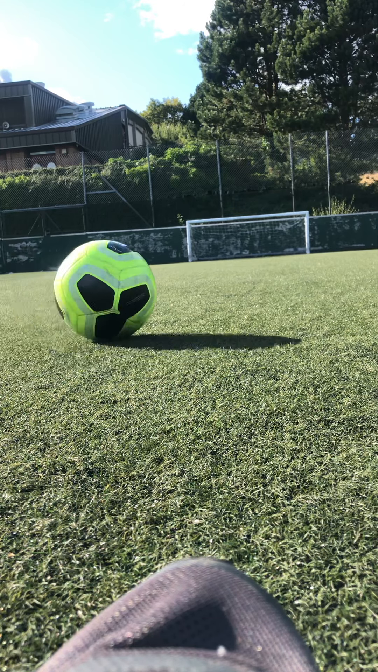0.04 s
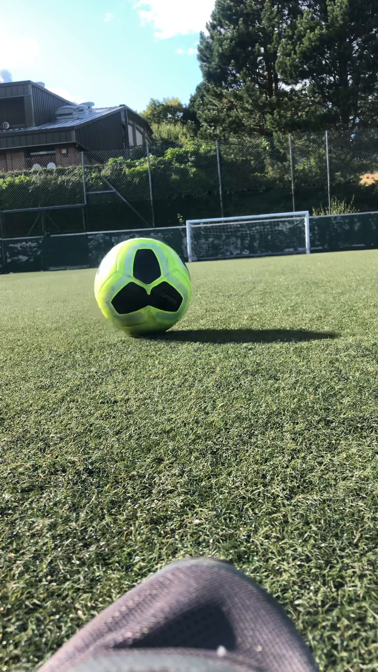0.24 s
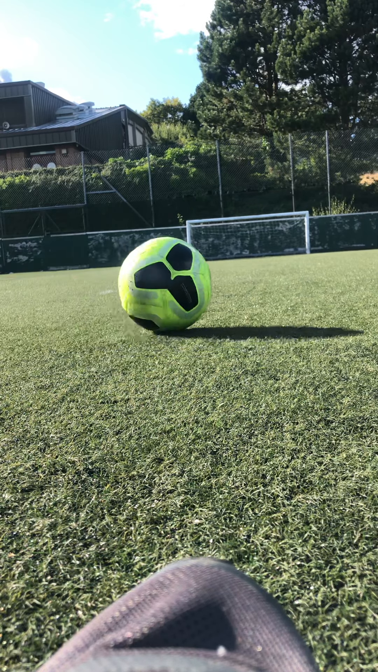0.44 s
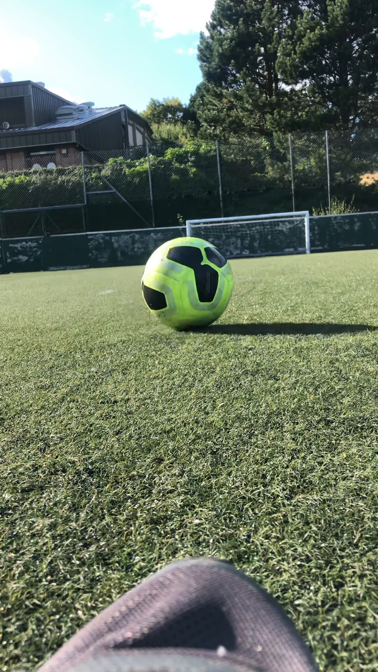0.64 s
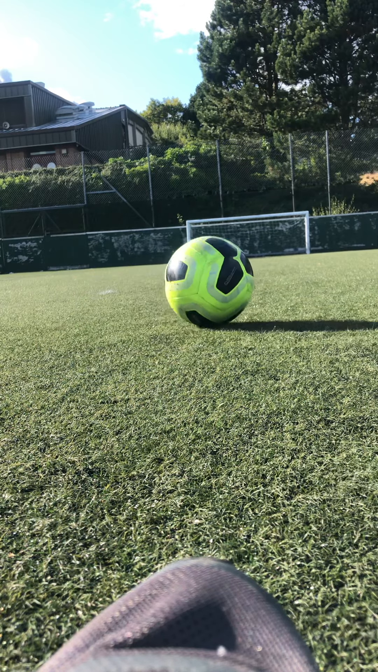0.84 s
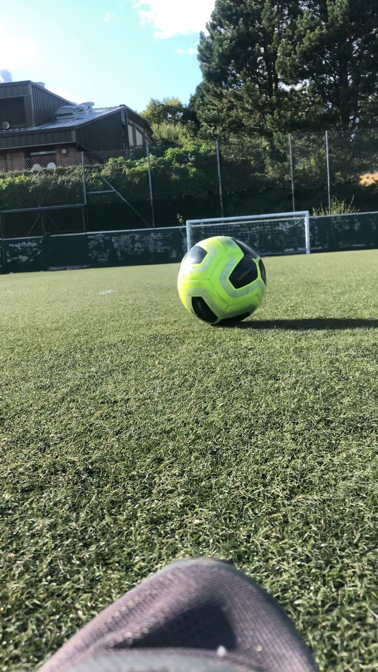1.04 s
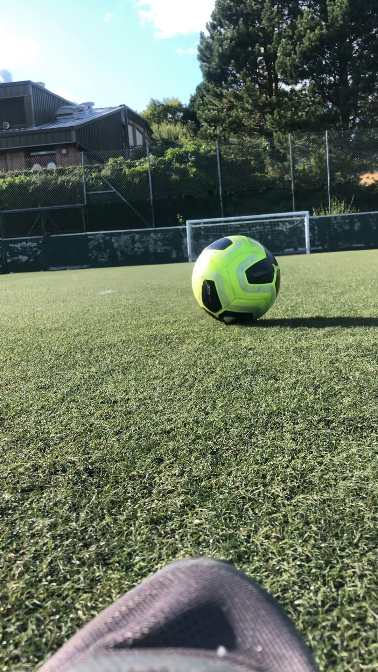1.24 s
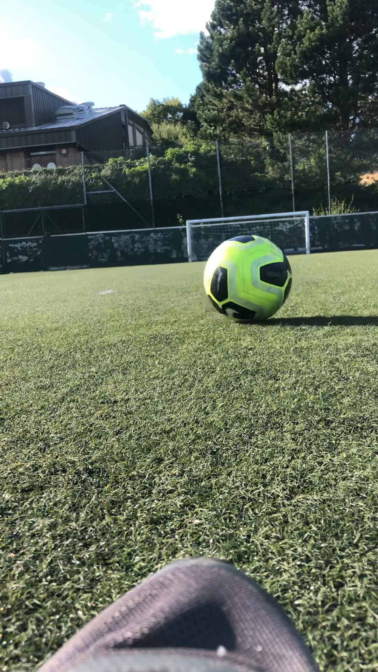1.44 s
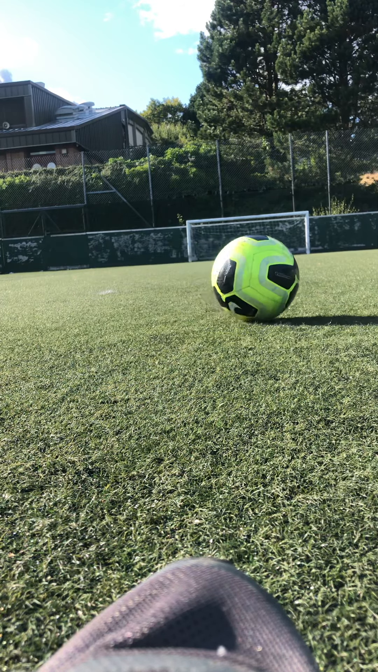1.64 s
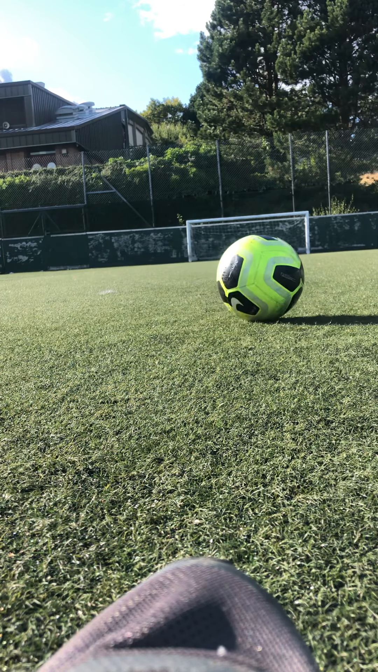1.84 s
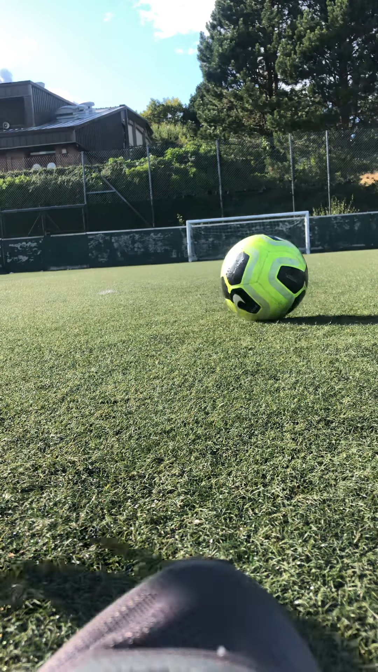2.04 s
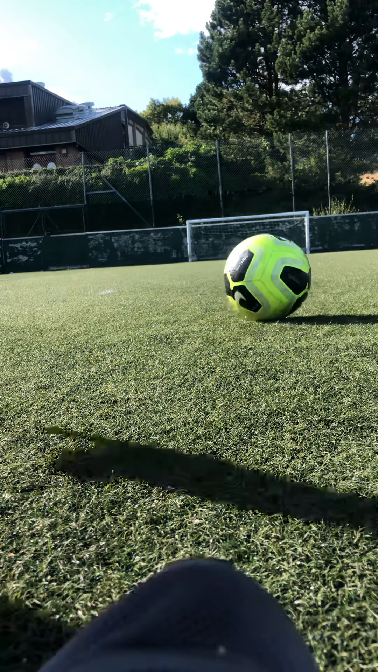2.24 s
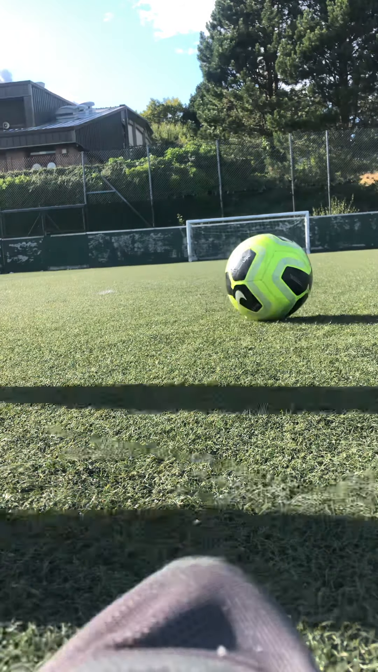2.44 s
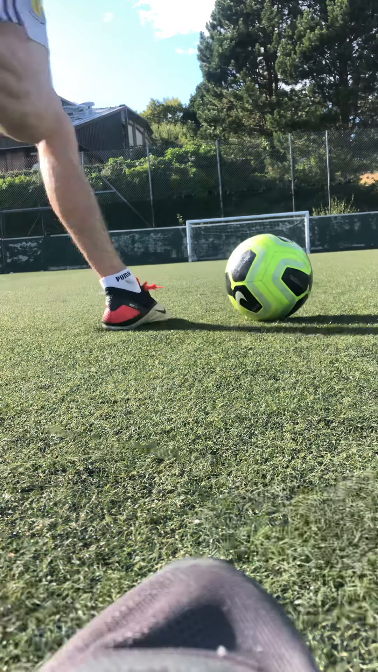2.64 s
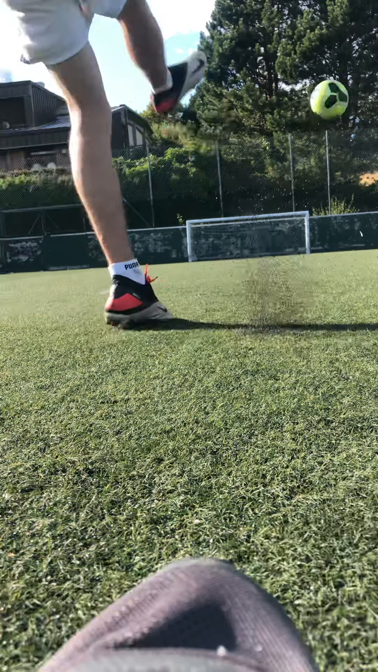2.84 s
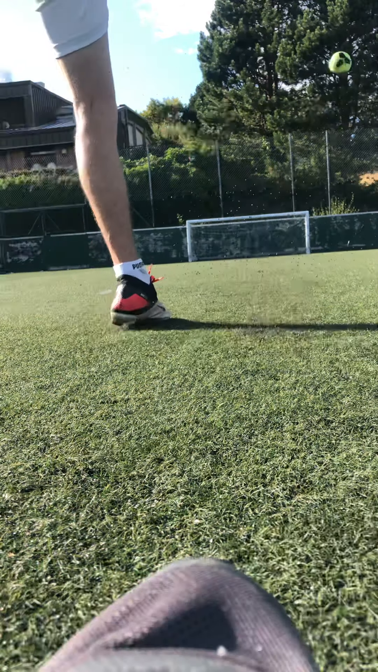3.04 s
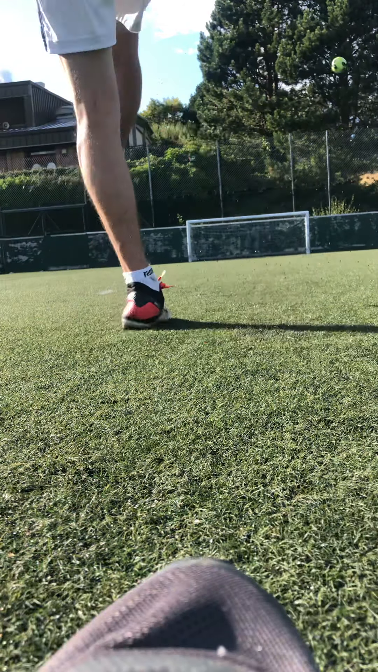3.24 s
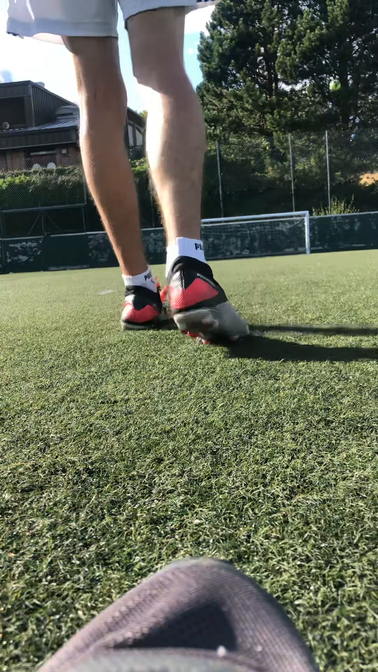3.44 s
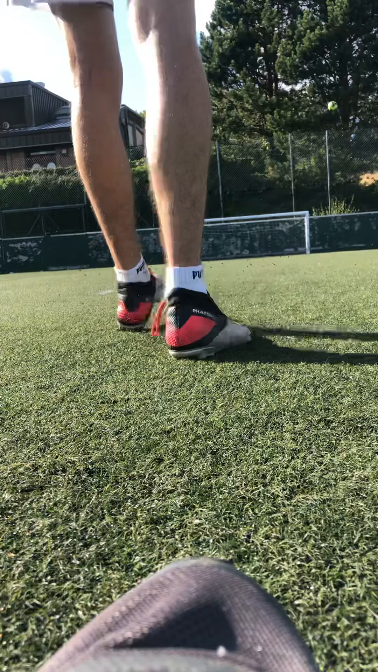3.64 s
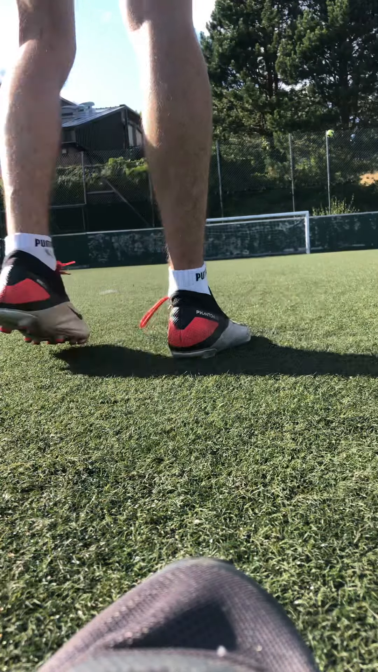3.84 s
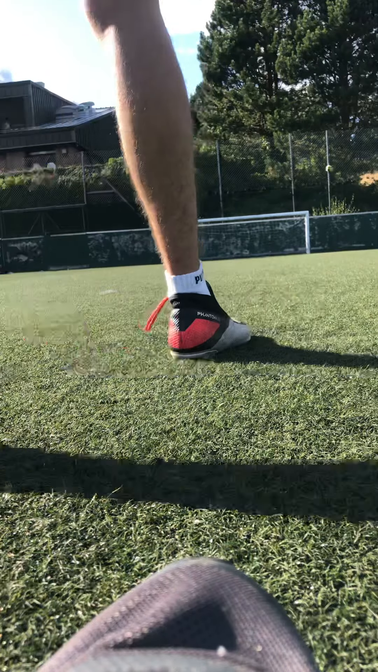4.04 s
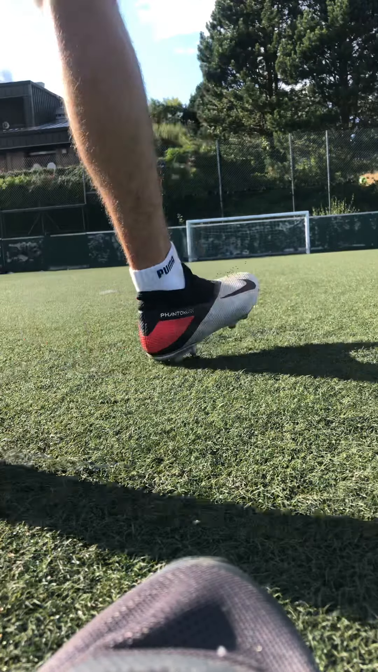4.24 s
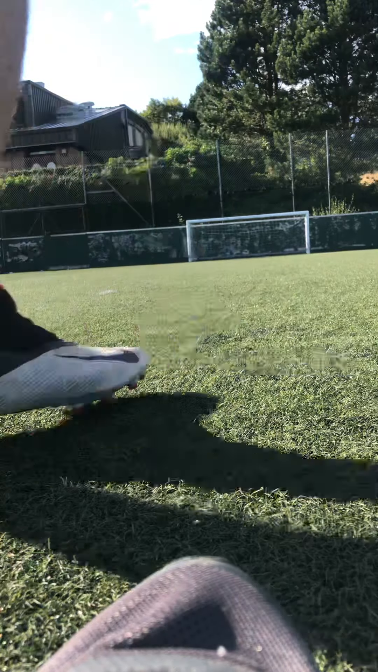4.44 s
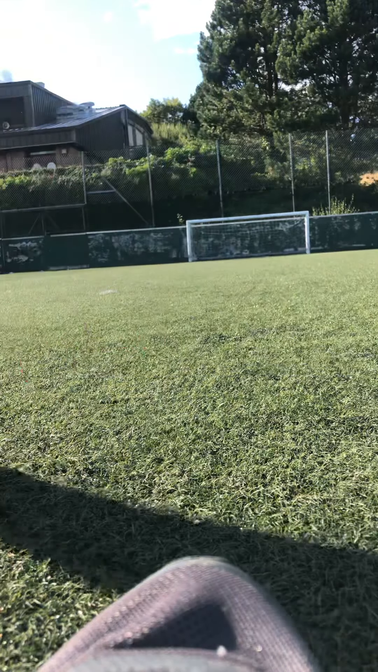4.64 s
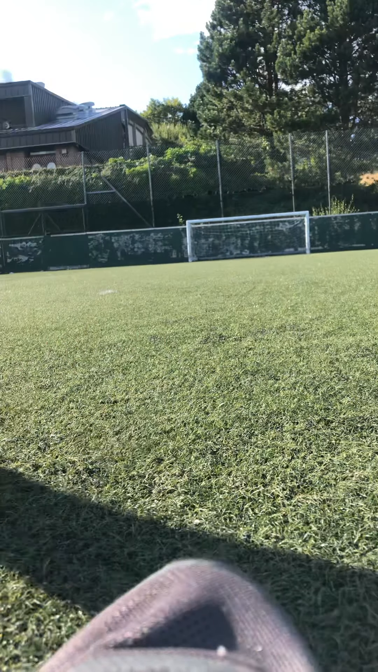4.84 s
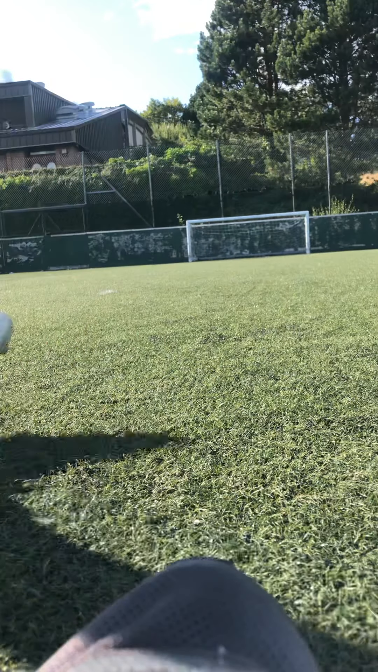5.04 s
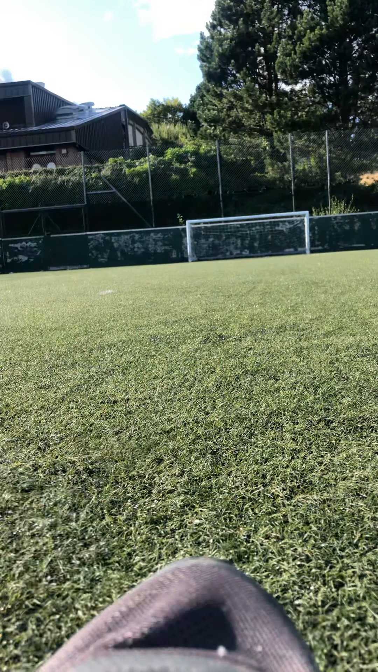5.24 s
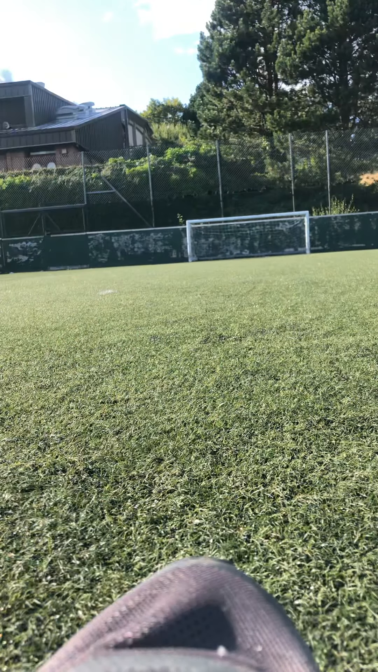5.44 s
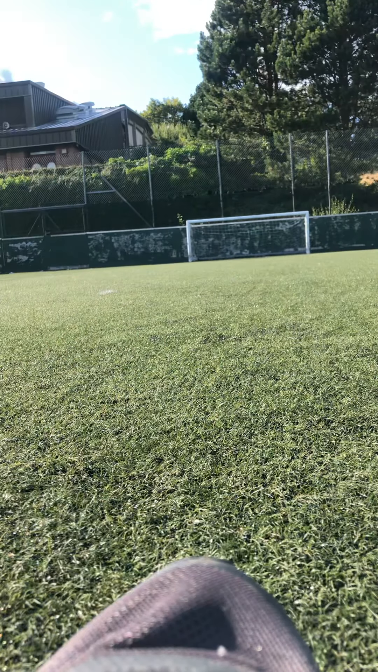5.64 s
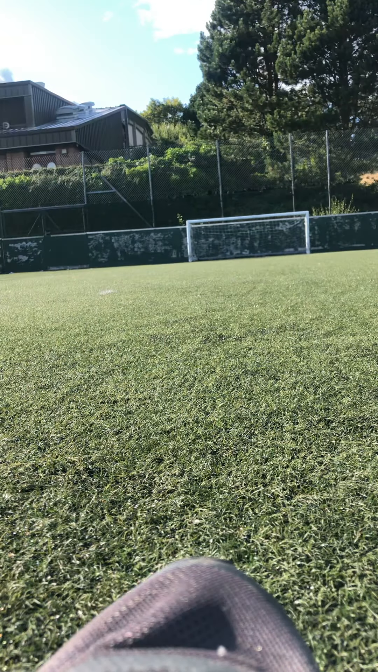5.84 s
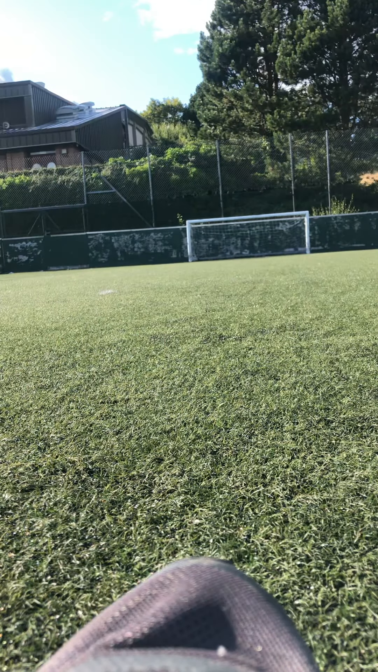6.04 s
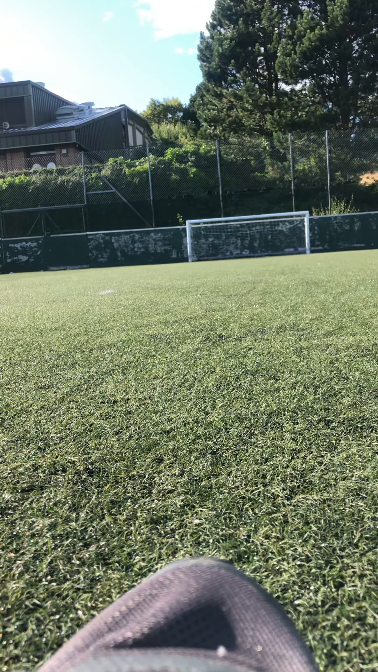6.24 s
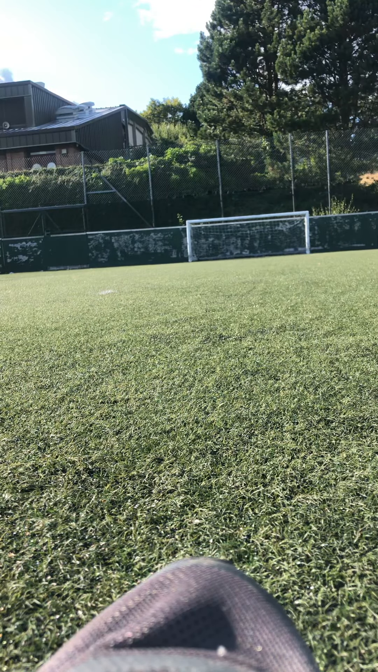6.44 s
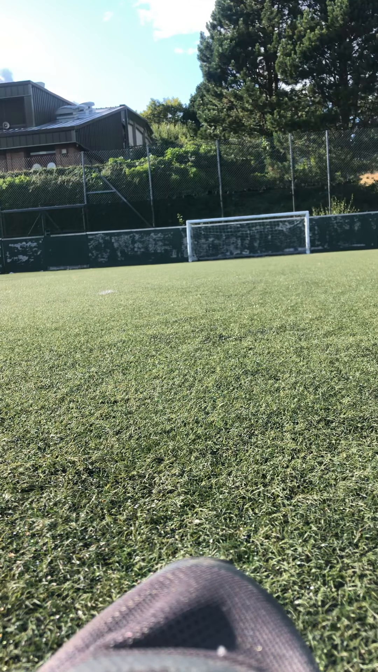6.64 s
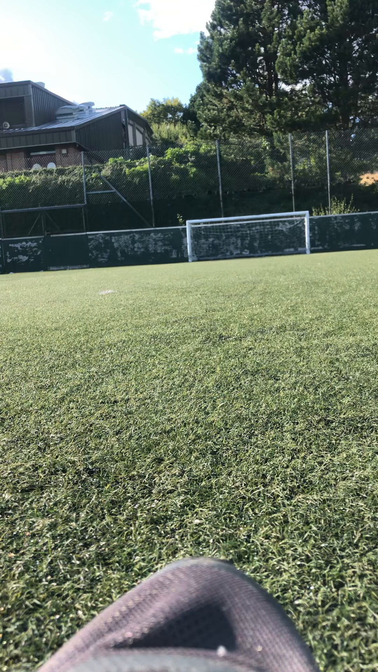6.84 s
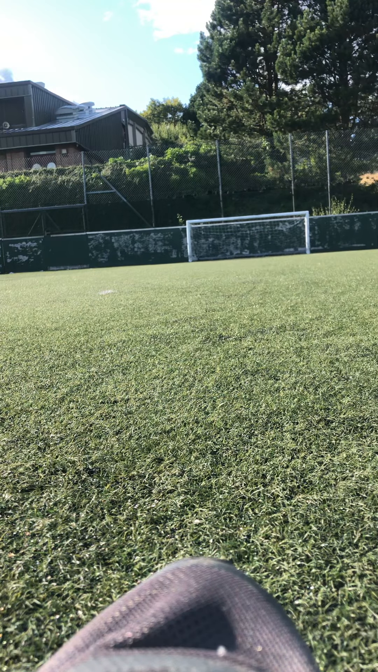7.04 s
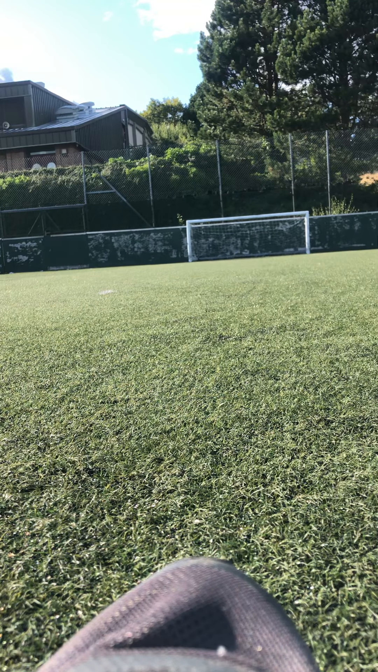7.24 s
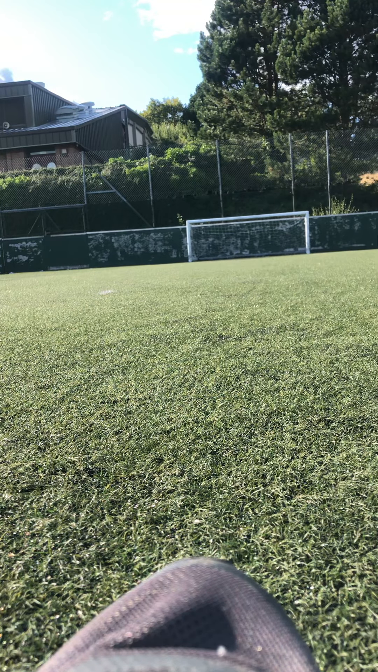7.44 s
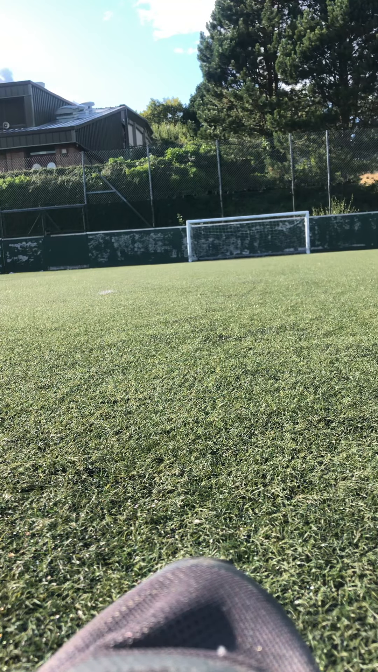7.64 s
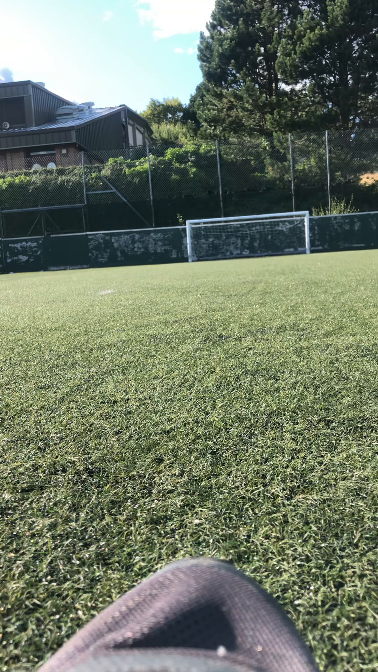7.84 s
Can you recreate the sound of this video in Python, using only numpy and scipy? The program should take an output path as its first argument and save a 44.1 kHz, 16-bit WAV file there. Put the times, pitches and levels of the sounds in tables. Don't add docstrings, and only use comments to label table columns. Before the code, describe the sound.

Quick steps on artificial turf, one hard kick with a sharp crack and deep thump, then a distant metal fence crash, rattle and fading bounces.

```python
import sys
import numpy as np
from scipy import signal
from scipy.fft import rfft, irfft
from scipy.io import wavfile
from scipy.ndimage import uniform_filter1d

SR = 44100
rng = np.random.default_rng(int(sys.argv[2]) if len(sys.argv) > 2 else 0)


def natural_amplitude(level_db):
    exponent = np.asarray(level_db, float) / 20
    return 10 ** exponent


def waveform_to_disk(signal):
    frames = np.transpose(np.atleast_2d(signal))
    scaled = np.clip(frames, -1, 1) * 32767
    samples = np.round(scaled).astype(np.int16)
    wavfile.write(sys.argv[1], SR, samples)


N = 348457
t = np.arange(N) / SR
freqs = np.fft.rfftfreq(N, 1 / SR)

# [f/Hz, level/dB per Hz]
TRAFFIC_TONE = [(12, -52), (20, -14.5), (75, 1.5), (97, -4.5), (129, -2), (163, -2.5), (247, -8.5),
                (416, -10), (452, -9), (492, -15.5), (572, -12.5), (723, -20.5), (1100, -42), (1430, -53),
                (2420, -120)]
# [f/Hz, level/dB per Hz]
AIR_TONE = [(530, -28.5), (900, -1), (2350, -9), (3020, -10.5), (3410, -9.5), (8680, -15.5), (15800, -20.5)]
# [t/s, level/dB, f/Hz]
HUM_PATH = [(0.0, -54, 100), (0.55, -64.5, 99), (0.81, -54, 98.7), (1.56, -52, 98.7), (2.22, -51.5, 97),
            (2.5, -60.5, 92), (3.0, -56, 98.6), (4.1, -56, 100.4), (4.8, -57, 105.1), (5.0, -67, 106),
            (5.3, -66, 110.6), (5.79, -57.5, 111), (6.05, -53, 95.7), (6.42, -57, 108.5), (7.0, -61, 104.3),
            (7.25, -61, 94), (7.6, -61.5, 108), (7.9, -57, 108.2)]
# [t/s, level/dB, fade/dB per s]
HUM_BOOMS = [
    (2.8, -38, 133.5),
    (4.19, -44, 21),
    (6.04, -64, 40.5),
]
# [t/s, level over the traffic/dB, fade/dB per s]
LOW_RUMBLES = [
    (2.8, 17.5, 90.5),
    (4.26, 7.5, 32),
    (4.67, -6, 53.5),
    (5.99, 3, 78),
]

# [t/s, thump
# level/dB, knock level/dB, thump f/Hz, knock f/Hz]
NEAR_BLOWS = [(2.445, -37.5, -46.5, 152, 453), (2.6318, -25.5, -18.5, 186.5, 760),
              (2.7554, 0.5, -2.5, 92, 585), (2.7607, -24.5, -8.5, 149.5, 324),
              (2.769, -31, -9.5, 150.1, 605), (2.804, -21, -24, 96.1, 501.3),
              (2.818, -39.5, -25, 99.9, 555), (2.872, -29, -32.5, 110, 377),
              (3.3792, -35, -31.5, 152.3, 885), (3.397, -30, -24, 190, 610), (5.986, -35.5, -42, 154, 1245)]
# [t/s, thump level/dB, knock level/dB, knock f/Hz, echo over the usual/dB]
FAR_BLOWS = [(0.263, -39.5, -45.5, 398, 4), (4.1553, -18, -16.5, 845, -1), (4.168, -26.5, -23.5, 504, -11),
             (4.2244, -23, -25.5, 317, 3.5), (4.65, -22, -26, 342, -2), (4.6604, -26.5, -27, 293, 0),
             (5.8164, -22.5, -28.5, 338, -1), (5.8695, -59.5, -37.5, 630, -4),
             (5.881, -41.5, -61.5, 295, 4), (5.9855, -27.5, -37.5, 439.7, 5), (6.0179, -50, -32, 242, 9),
             (6.051, -33.5, -41, 298, -1.5), (6.7072, -28, -31, 357, 0.5), (6.998, -45, -42.5, 550, -11.5),
             (7.185, -43, -52.5, 398, -1.5), (7.405, -34.5, -35.5, 455, -1.5), (7.49, -42, -58, 397, -1)]

# [t/s, peak level/dB, centre f/Hz]
STUD_TICKS = [(1.7085, -49, 2200), (2.2618, -59, 1798), (2.6134, -40, 2760), (2.6195, -46, 3570),
              (2.7549, -1.5, 3800), (3.3678, -44, 5020), (3.3714, -30, 9000), (3.379, -24.5, 2430),
              (4.809, -40, 2400), (4.9866, -41, 2205), (5.4482, -54, 1977), (5.8684, -42, 1800),
              (5.8985, -40, 1390), (5.9843, -33.5, 4310), (6.0432, -44, 4260), (6.4483, -64, 4200)]
# [t/s, peak level/dB]
FLUNG_CRUMBS = [
    (2.7884, -32.5),
    (2.803, -38.5),
    (2.8159, -40),
    (2.8661, -38),
    (2.8898, -43),
    (2.9218, -40.5),
    (3.1202, -47),
]
# [t/s, peak level/dB]
DROPPED_CRUMBS = [
    (3.5373, -44),
    (3.6029, -42.5),
    (3.6462, -44),
    (3.715, -43.5),
    (3.727, -45.5),
    (3.7633, -41.5),
    (3.7931, -44),
    (3.8276, -47),
    (3.8542, -46),
    (3.876, -51),
]

# [t/s, length/s, start f/Hz, end f/Hz, level/dB]
BIRD_CHEEPS = [
    (1.994, 0.0048, 2150, 2010, -58),
    (4.901, 0.029, 4260, 4320, -68),
    (5.204, 0.032, 4320, 4300, -70),
    (5.483, 0.033, 4270, 4290, -71),
    (5.757, 0.032, 4290, 4400, -68),
    (6.464, 0.028, 4250, 4400, -71.5),
    (4.747, 0.021, 7300, 7250, -65.5),
]

# [t/s, length/s, grit level/dB, hiss level/dB, change over the length/dB]
BOOT_BRUSHES = [(2.12, 0.046, -52.5, -63, -16), (2.407, 0.034, -65, -77.5, 12),
                (2.445, 0.029, -53.5, -62, -17), (2.602, .024, -44.5, -59, -0.5),
                (2.63, 0.019, -40, -51.5, -18.5), (2.658, 0.065, -63.5, -64, 5.5),
                (2.73, 0.01, -45.5, -53.5, -1), (2.7439, 0.0087, -25.5, -30.5, -3.5),
                (2.806, .03, -41, -48, -23), (2.865, 0.026, -58, -59.5, -13),
                (3.015, 0.022, -61.5, -71, -7), (3.389, 0.017, -32, -51, 1), (3.42, 0.072, -33, -48.5, 0.5),
                (3.501, 0.037, -43, -56, -20.5), (3.95, 0.083, -46.5, -57.5, 4.5),
                (4.045, 0.051, -55.5, -62, -7.5), (4.9, .035, -60, -77, -2.5), (5.07, 0.034, -61, -76, -8),
                (5.168, 0.042, -48.5, -56.5, 0.5), (5.593, 0.036, -69, -72.5, -6),
                (5.988, 0.021, -53, -49, -21), (6.447, 0.017, -58, -67.5, -12)]
# [t/s, length/s, grit level/dB, hiss level/dB, change over the length/dB]
SLOW_BRUSHES = [
    (2.2, 0.23, -75, -72.5, 0),
    (2.85, 0.34, -62, -57.5, -19),
    (3.55, .33, -61, -63, -10.5),
    (4.88, 0.24, -59, -65.5, 1),
    (5.585, 0.14, -63.5, -64, -9),
    (6.03, .25, -68, -66.5, -10),
]
# [t/s, level/dB]
CRUMB_SPRAY = [
    (2.758, -26),
    (2.766, -44),
    (2.774, -58),
    (2.797, -64),
]
# [f/Hz, level/dB per Hz]
FIBRE_TONE = [(710, -30), (1200, -15.5), (2480, -16), (3110, -15.5), (4220, -15), (12700, -25.5),
              (15000, -32.5), (16000, -35.5)]
# [f/Hz, level/dB per Hz]
CRUNCH_TONE = [(260, -27), (450, 0.5), (736, 3), (940, -8), (1080, -2), (1720, -17.5), (2200, -20),
               (2860, -53), (4840, -120)]

# [f/Hz, level/dB, time to fall 60 dB/s]
BALL_MODES = [(1174.6, -20.5, .2), (1760, -12.5, 0.47), (2331, 5, 0.18), (2960, -0.5, .22),
              (3080, -5, 0.46), (3070, -7.5, 0.51), (3440, 3.5, 0.13), (3683, -8, 0.33), (4050, -8, 0.1522),
              (4410, -13.5, .25), (5037, -21.5, .2)]

# [f/Hz, level/dB, time to fall 60 dB/s]
FENCE_MODES = [(3340, -7.5, 0.36), (3639, -19, 0.12), (5728, -22, .1), (7220, -6, .1), (6800, -13, .25),
               (7558, -21, .25), (8920, -2, 0.12), (9830, -5, 0.089)]
# [f/Hz, width/Hz, level/dB, change/dB per s]
RATTLING_BARS = [(3310, 140, -3.5, 1), (3860, 2300, 0.5, 7.5), (7300, 350, 2, -37.5), (9000, 1400, -4, -45),
                 (10000, 2000, -13, -51)]
# [t/s, level/dB]
FENCE_SHIVER = [
    (4.155, -30),
    (4.183, -37),
    (4.34, -41),
    (4.42, -47),
    (4.529, -56.5),
    (4.75, -66),
    (4.9, -71),
]
# [f/Hz, level/dB per Hz]
MESH_TONE = [(530, -45), (900, -10), (2500, -17.5), (3340, -7.5), (6640, -10.5), (7310, 6.5), (8150, -16),
             (14700, -83.5), (16000, -45.5)]


def level(x, db):
    return x * natural_amplitude(db) / np.sqrt(np.mean(x ** 2))


def peak1(x):
    return x / np.abs(x).max()


def add(out, s, x):
    i = int(s * SR)
    out[i:i + len(x)] += x[:N - i]


def band(x, lo_hz, hi_hz, order):
    edges_hz = [lo_hz, min(hi_hz, SR / 2.2)]
    return signal.sosfilt(signal.butter(order, edges_hz, "bandpass", fs=SR, output="sos"), x)


def colour(x, tone):
    hz, db = np.transpose(tone)
    gain = natural_amplitude(np.interp(np.log(freqs + 1), np.log(hz), db))
    return level(irfft(rfft(x) * gain, N), 0)


def curve(rows, column):
    rows = np.array(rows)
    return natural_amplitude(np.interp(t, rows[:, 0], rows[:, column], left=-200, right=-200))


def fading(s, db, fade_db, rise_s):
    since = np.clip(t - s, 0, None)
    return natural_amplitude(db - fade_db * since) * np.clip(since / rise_s, 0, 1)


def walk(rate):
    hold = int(SR / rate)
    steps = np.repeat(rng.standard_normal(N // hold + 1), hold)
    return 1.3 * uniform_filter1d(uniform_filter1d(steps, hold), hold)[:N]


def grains(share, spread_db):
    chance = rng.random((3, N))
    size_db = np.minimum(-spread_db * np.log(1 - chance[2]), 12)
    return (chance[0] < share) * np.sign(chance[1] - 0.5) * natural_amplitude(size_db)


def wavelet(hz, cycles, rise):
    turns = t[:SR // 10] * hz
    start = 1 - np.exp(-(turns / rise) ** 2)
    return peak1(start * np.cos(2 * np.pi * turns - 0.8) * np.exp(-(turns / cycles) ** 2))


def ring(modes, s, rise_s, warble_db):
    since = np.clip(t - s, 0, None)
    out = np.zeros(N)
    for hz, db, t60 in modes:
        out += natural_amplitude(db - 60 * since / t60 + warble_db * walk(40)) * np.sin(2 * np.pi * hz * since)
    return out * (1 - np.exp(-since / rise_s))


def town():
    swell = natural_amplitude(-55.22 + 0.6 * walk(3.09))
    rumble = 1 + sum(fading(*row, rise_s=0.026) for row in LOW_RUMBLES)
    traffic = colour(rng.standard_normal(N), TRAFFIC_TONE) * swell * rumble
    air = colour(rng.standard_normal(N), AIR_TONE) * natural_amplitude(-71.5)
    times, _, pitches = np.transpose(HUM_PATH)
    hz = np.interp(t, times, pitches) * (1 + 0.03 * walk(18))
    hum = np.sqrt(2) * np.sin(2 * np.pi * np.cumsum(hz) / SR) * natural_amplitude(2.0 * walk(28))
    boom = sum(fading(*row, rise_s=0.025) for row in HUM_BOOMS)
    return traffic + air + hum * (curve(HUM_PATH, column=1) + boom)


def echo(blow):
    u = t[:SR]
    uneven_db = 3.5 * rng.standard_normal(SR // 441 + 1).repeat(441)[:SR]
    scatter = rng.standard_normal(SR) * natural_amplitude(uneven_db)
    scatter *= np.exp(-np.log(1000) * u / 0.45)
    scatter *= np.clip((u - 0.025) / 0.01, 0, 1)
    return signal.fftconvolve(blow, scatter)


def blows():
    out = np.zeros(N)
    near_cycles, far_cycles = 1.6, 1.16
    near_echo_db, far_echo_db = -47, -36
    rows = [(*row, near_echo_db, near_cycles) for row in NEAR_BLOWS]
    for s, thump_db, knock_db, knock_hz, more_echo_db in FAR_BLOWS:
        ground_hz = 92 - max(thump_db + 20, -20)
        rows.append((s, thump_db, knock_db, ground_hz, knock_hz, far_echo_db + more_echo_db, far_cycles))
    for s, thump_db, knock_db, thump_hz, knock_hz, echo_db, cycles in rows:
        thump = natural_amplitude(thump_db) * wavelet(thump_hz, cycles=1.1, rise=0.38)
        knock = natural_amplitude(knock_db) * wavelet(knock_hz, cycles=cycles, rise=0.45)
        add(out, s, thump + knock)
        add(out, s, natural_amplitude(echo_db) * echo(thump + natural_amplitude(-8) * knock))
    for s, _, knock_db, knock_hz, _ in FAR_BLOWS:
        add(out, s + 0.009, natural_amplitude(knock_db - 12.5) * wavelet(knock_hz * 1.36, cycles=2.15, rise=0.35))
    return out


def ticks():
    out, u = np.zeros(N), t[:512]
    flung_hz, dropped_hz = 2900, 4720
    rows = STUD_TICKS + [(*row, flung_hz) for row in FLUNG_CRUMBS]
    rows = rows + [(*row, dropped_hz) for row in DROPPED_CRUMBS]
    for s, db, hz in rows:
        splinters = rng.standard_normal(len(u)) * natural_amplitude(-16 - 60 * u / 0.0076)
        click = splinters - signal.unit_impulse(len(u))
        click = band(click, hz / 2.0, hz * 2.9, order=1)
        click = band(click, hz / 2.4, min(hz * 2.5, 11000), order=1)
        add(out, s + 0.0008, natural_amplitude(db) * peak1(click))
    return out


def bird():
    out = np.zeros(N)
    for s, length, start_hz, end_hz, db in BIRD_CHEEPS:
        u = np.arange(int(length * SR)) / SR
        swell = np.sin(np.pi * u / length) ** 0.19
        add(out, s, natural_amplitude(db) * swell * signal.chirp(u, start_hz, length, end_hz))
    out *= natural_amplitude(1.0 + 3.9 * walk(250))
    trees = rng.standard_normal(SR // 8) * natural_amplitude(-45 - 60 * t[:SR // 8] / 0.094)
    return out + signal.fftconvolve(out, trees)[:N]


def brushes(column):
    out = np.full(N, 1e-9)
    for rows, longest_edge_s in ((BOOT_BRUSHES, 0.0084), (SLOW_BRUSHES, 0.04)):
        for row in rows:
            s, length, change_db = row[0], row[1], row[4]
            edge = min(0.27 * length, longest_edge_s)
            a, b = int((s - edge) * SR), int((s + length + edge) * SR)
            corners_s = [s - edge, s, s + length, s + length + edge]
            shape_db = np.interp(t[a:b], corners_s, [-18, 0, change_db, change_db - 17])
            out[a:b] += natural_amplitude(row[column] + shape_db)
    return out


def scuffs():
    grit, brush = brushes(column=2), brushes(column=3)
    crunch = band(colour(grains(0.03, 1.4), CRUNCH_TONE) * grit, 300, 2300, order=2)
    sole = level(band(grains(0.012, 2.0), 150, 410, order=2), -1)
    tread = band(sole * grit, 120, 870, order=2)
    hiss = colour(grains(0.15, 2.9), FIBRE_TONE) * natural_amplitude(1.3 * walk(70))
    hiss *= brush + curve(CRUMB_SPRAY, column=1)
    return natural_amplitude(-1.26) * crunch + tread + natural_amplitude(-1.2) * hiss


def ball():
    return natural_amplitude(-40.5) * ring(BALL_MODES, 2.768, rise_s=0.012, warble_db=1.5)


def rattling_bars(since):
    knocks, out = grains(0.18, 1.2), np.zeros(N)
    for hz, width_hz, db, fade_db in RATTLING_BARS:
        bar = level(band(knocks, hz - width_hz / 2, hz + width_hz / 2, order=1), 0)
        out += natural_amplitude(db + fade_db * since + 2.5 * walk(45)) * bar
    return out


def wire_mesh(since):
    mesh = colour(rng.standard_normal(N), MESH_TONE) * natural_amplitude(-15 * since)
    split_hz, hold_s, fade_db_s = 8500, 0.19, 161
    fine = band(mesh, split_hz, SR / 2, order=2)
    fine *= natural_amplitude(-fade_db_s * np.clip(since - hold_s, 0, 1))
    return band(mesh, 300, split_hz, order=2) - fine


def boards():
    knocks = level(band(grains(0.012, 3.5), 144, 318, order=2), 0)
    gain = fading(4.17, db=-34, fade_db=56, rise_s=0.031) * natural_amplitude(2.6 * walk(30))
    return band(gain * knocks, 85, 1270, order=2)


def fence():
    since = np.clip(t - FENCE_SHIVER[0][0], 0, 1)
    shaking = natural_amplitude(-3.5) * wire_mesh(since) + natural_amplitude(-12) * rattling_bars(since)
    struck = natural_amplitude(-30.5) * ring(FENCE_MODES, 4.1555, rise_s=0.00096, warble_db=1.5)
    return curve(FENCE_SHIVER, column=1) * shaking + boards() + struck


def scene():
    return (town() + blows() + ticks() + bird() + scuffs() + ball() + fence())[None]


def band_limit(x):
    return signal.sosfilt(signal.butter(12, 17330, fs=SR, output="sos"), x)


def record(dry):
    lag = np.exp(2j * np.pi * 1.2 * np.log(1 + 1500 / np.maximum(freqs, 25)))
    treble_cut = np.where(freqs < 15800, 1, natural_amplitude(-31.5))
    bass_cut = 1 / np.sqrt(1 + (48 / (freqs + 1)) ** 6)
    mix = irfft(rfft(dry) * lag * treble_cut * bass_cut, N)
    return band_limit(mix)


dry = scene()
out = record(dry)
waveform_to_disk(out)
```